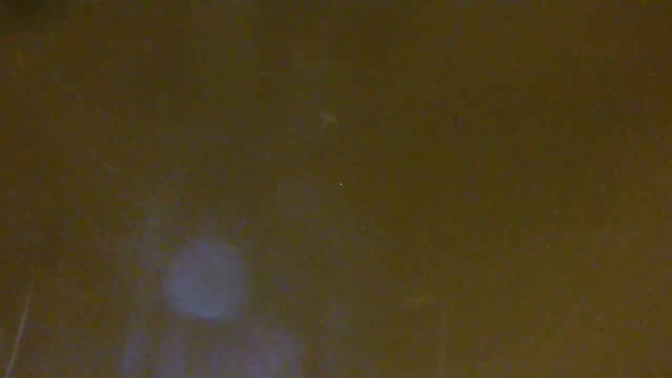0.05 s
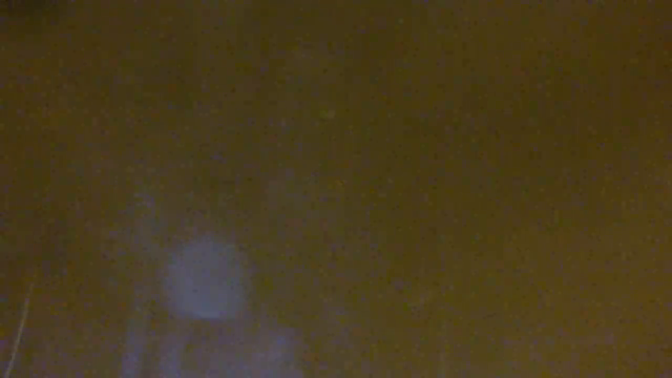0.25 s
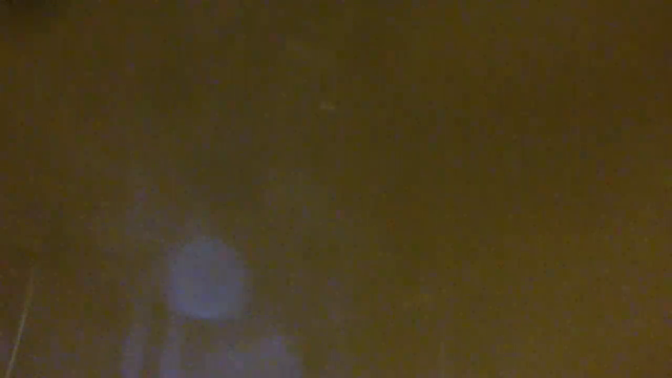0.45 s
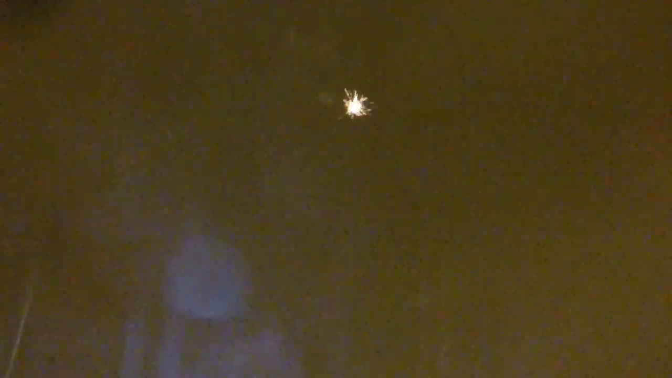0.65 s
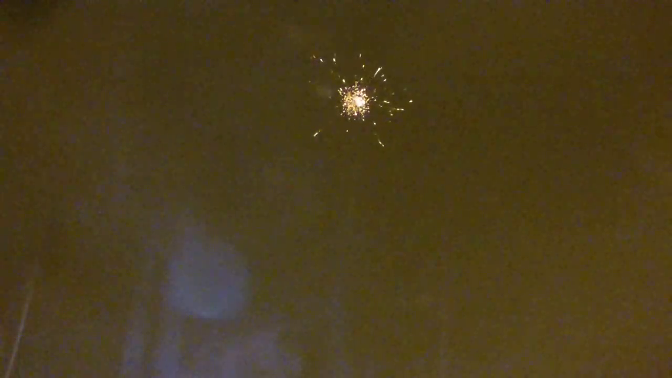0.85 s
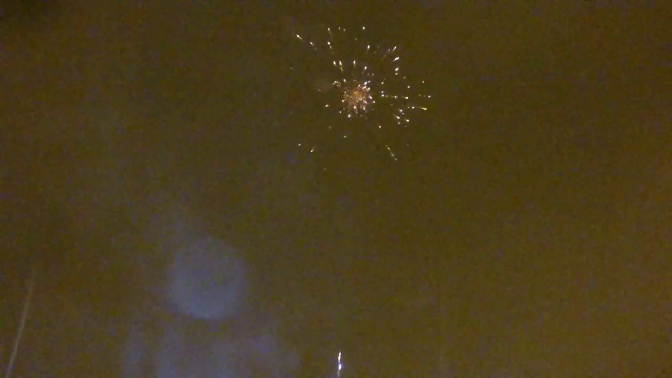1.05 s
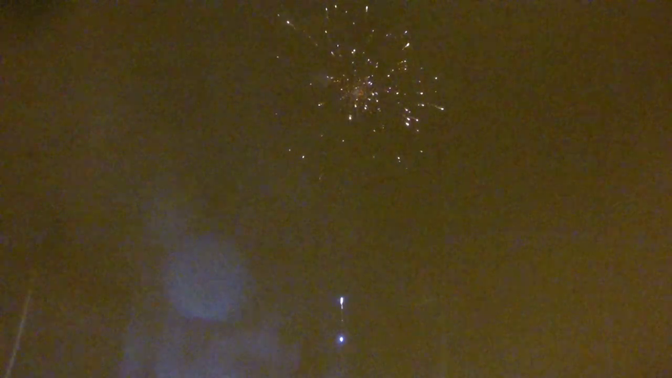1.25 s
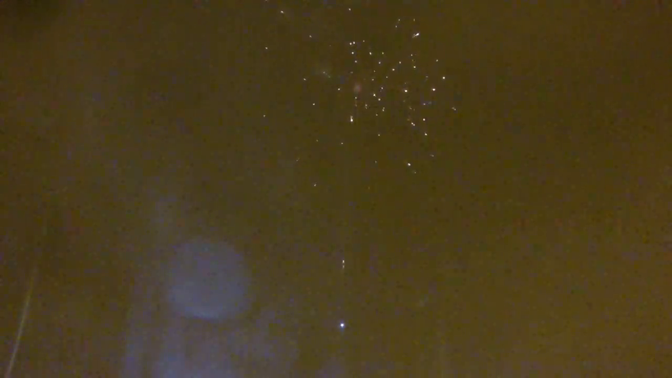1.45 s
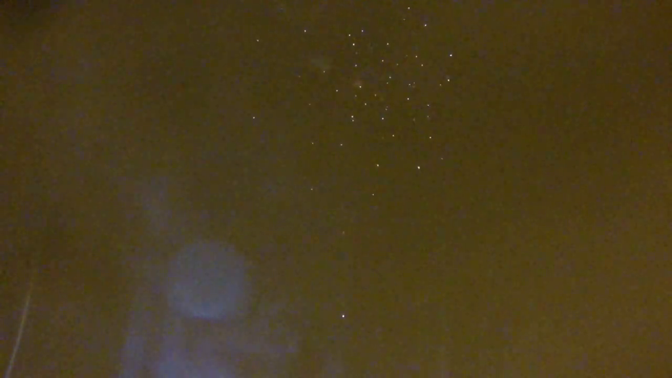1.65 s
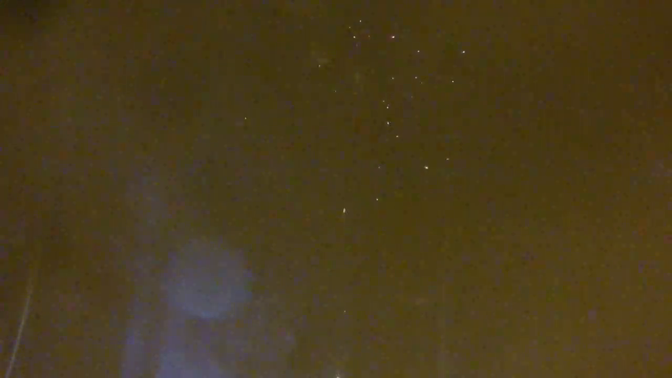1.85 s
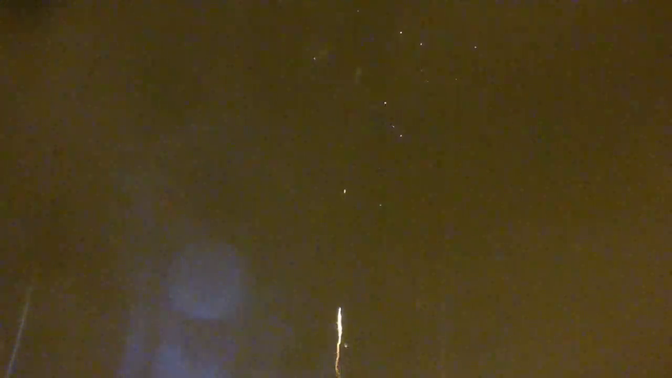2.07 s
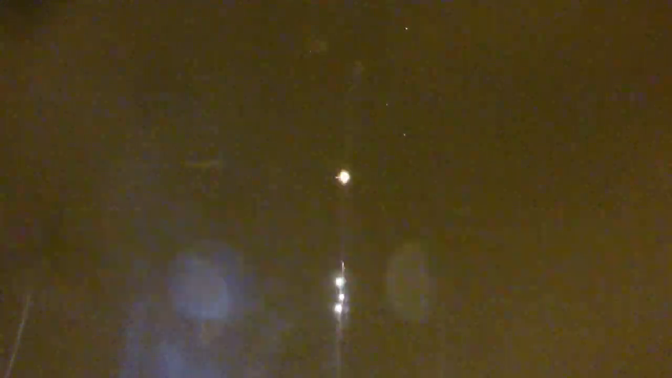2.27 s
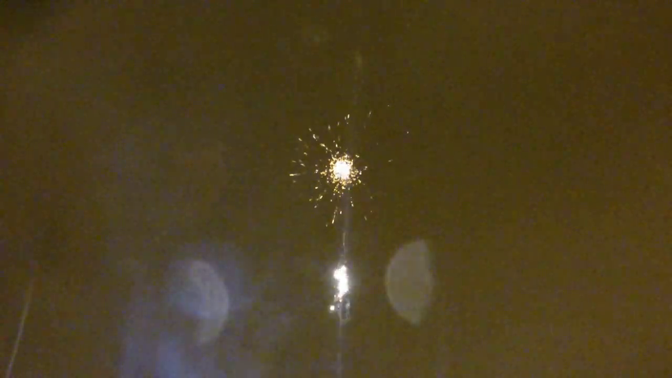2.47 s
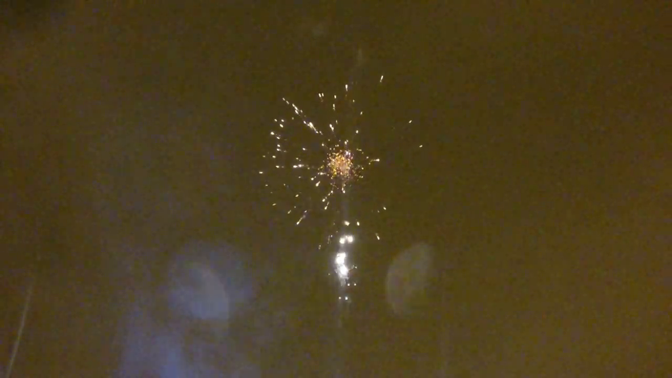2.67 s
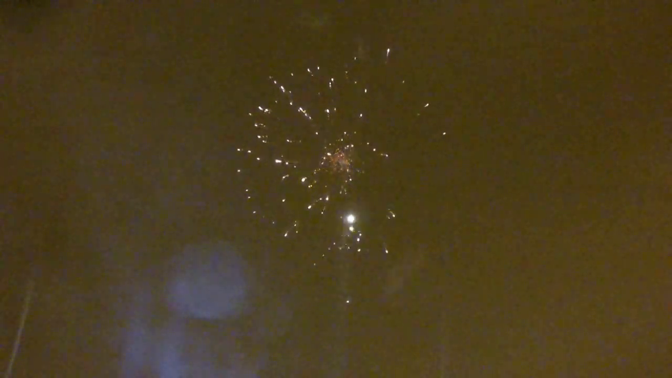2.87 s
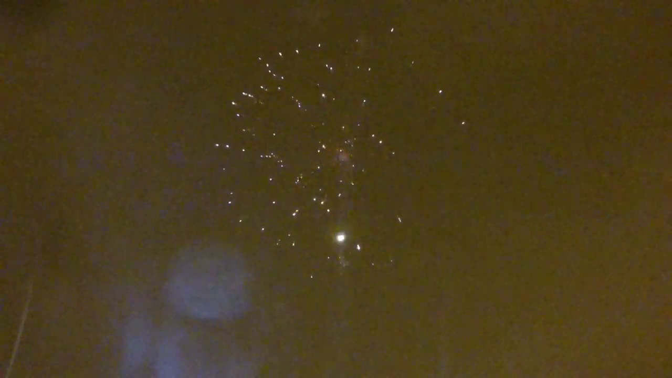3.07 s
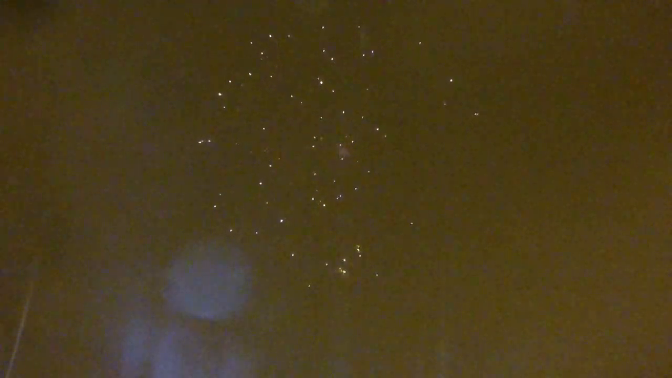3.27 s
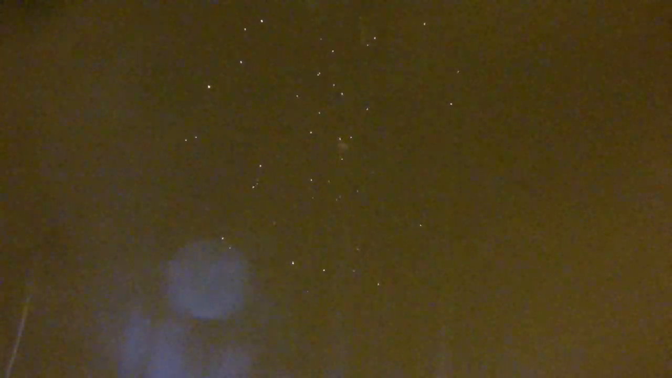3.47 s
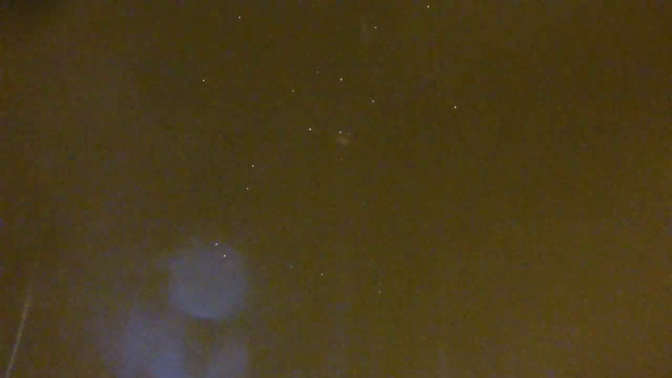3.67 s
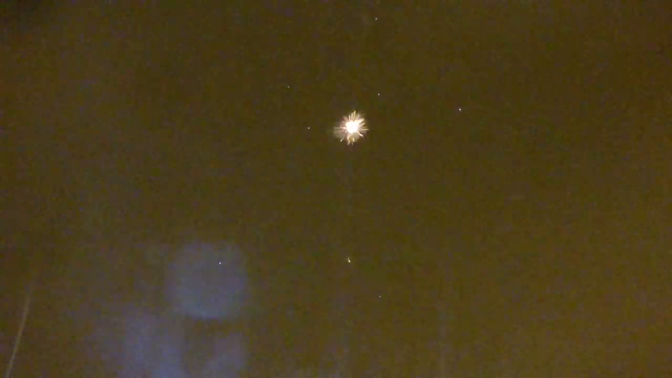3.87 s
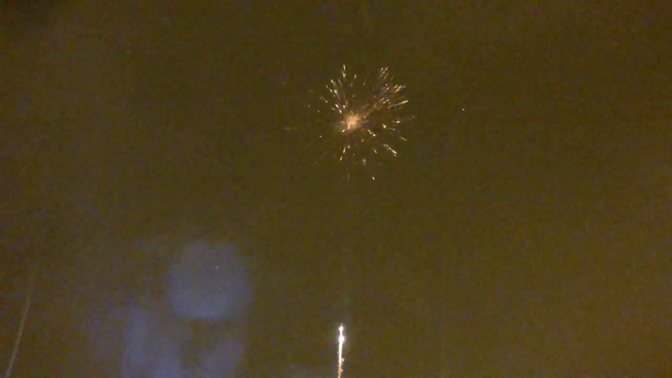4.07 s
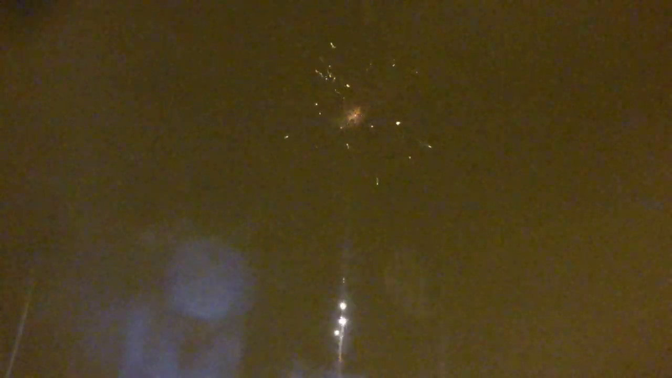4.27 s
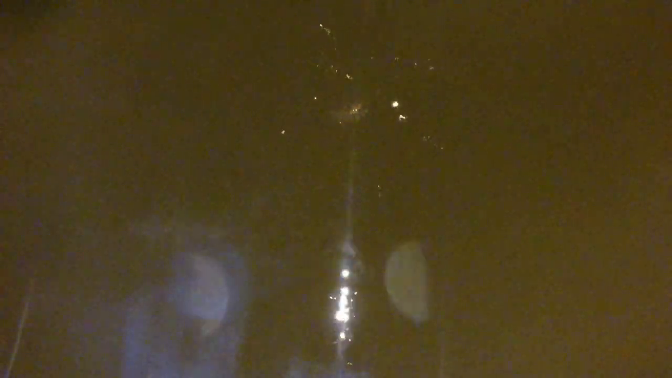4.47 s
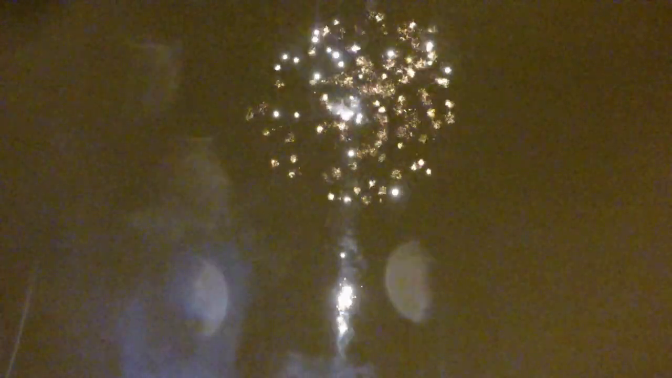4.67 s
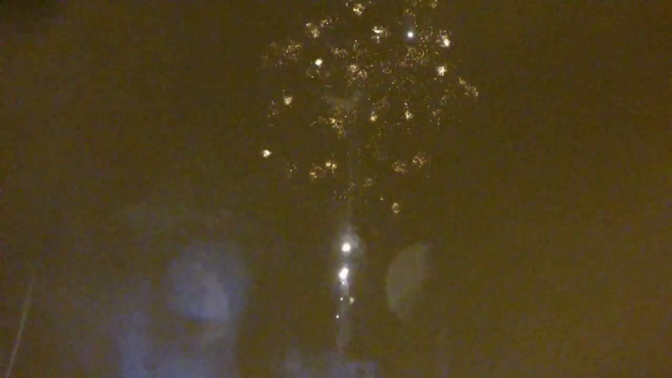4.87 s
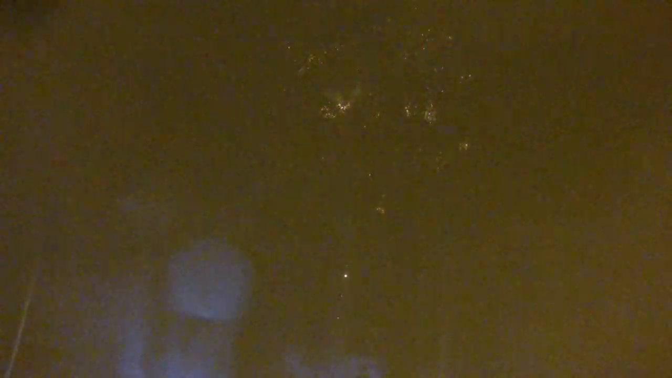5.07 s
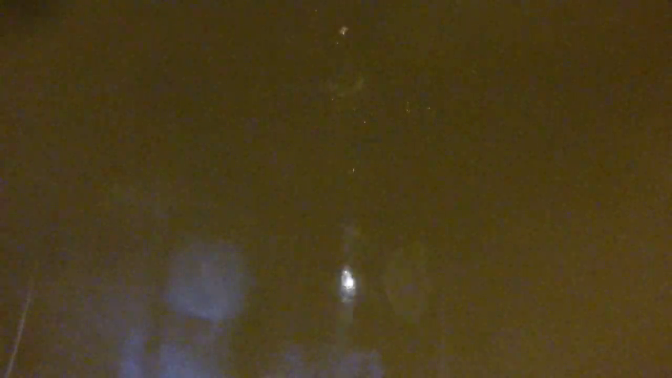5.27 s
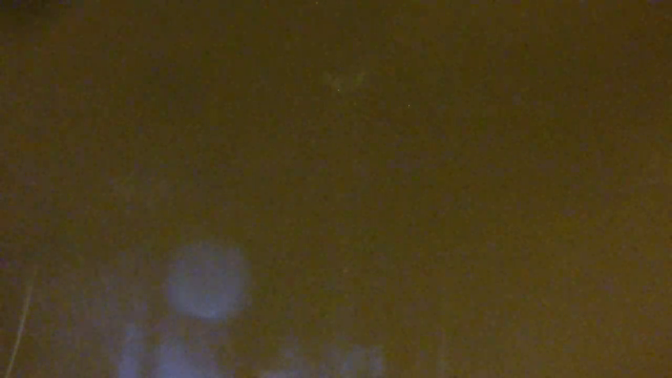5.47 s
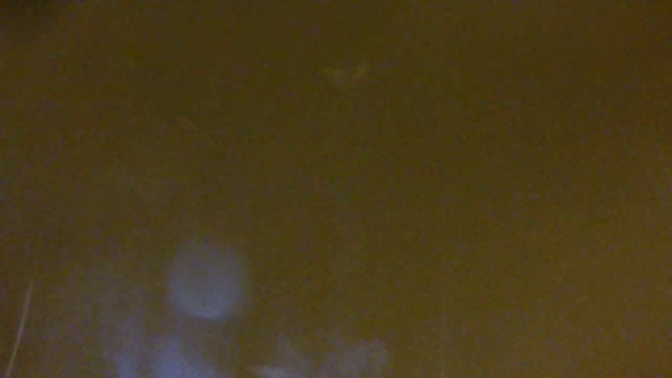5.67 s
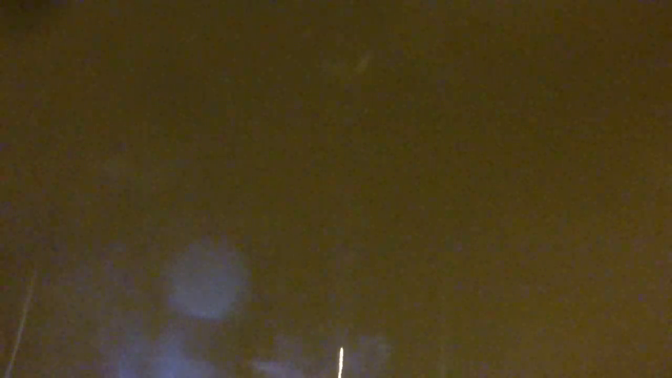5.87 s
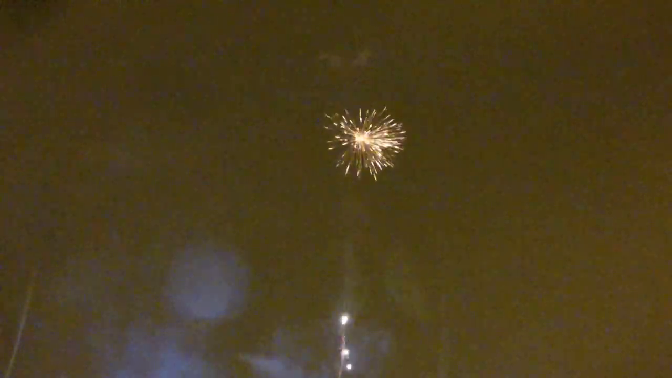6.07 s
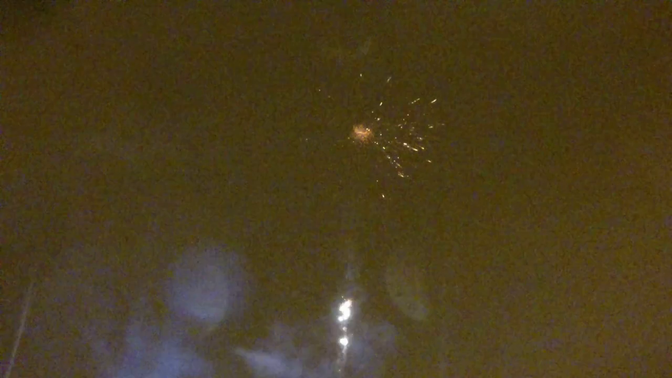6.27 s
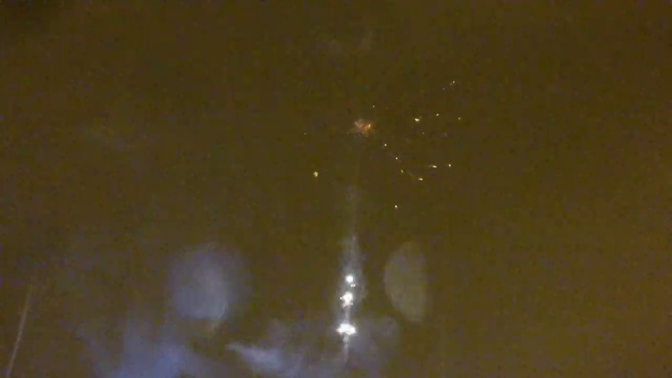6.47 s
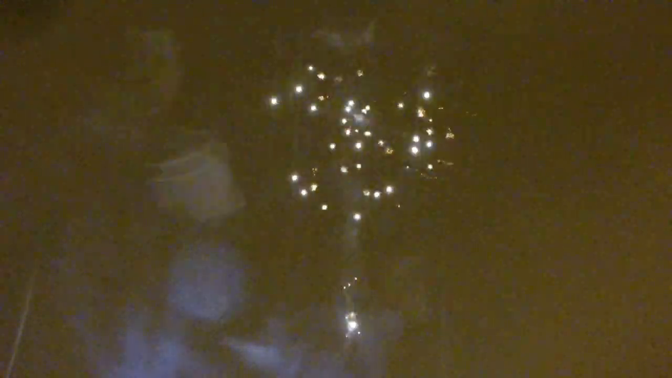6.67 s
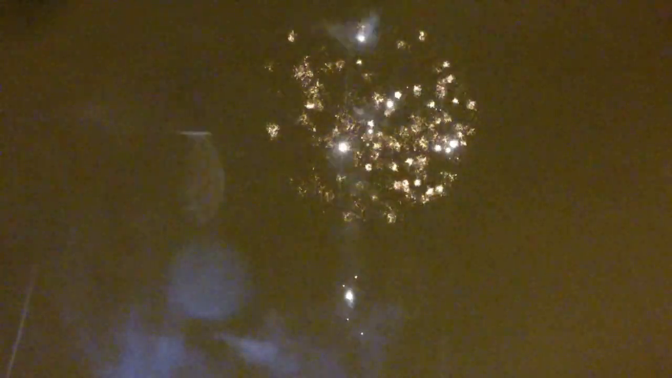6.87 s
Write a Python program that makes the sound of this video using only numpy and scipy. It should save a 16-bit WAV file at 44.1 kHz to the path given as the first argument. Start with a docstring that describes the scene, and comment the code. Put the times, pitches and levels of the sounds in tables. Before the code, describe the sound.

Four sharp firework bangs, the last three followed by swelling crackle, heard from inside an idling car with low wind rumble.

```python
"""A firework cake at night, heard on a camera microphone inside a parked car.
From the start the engine idles and wind makes the cabin boom; a bit of plastic ticks close by.
Outside, a first shell bursts with one sharp bang, echoes off the houses and fizzles out. Three more
each leave the tube with a soft thud, burst and scatter stars that crackle in a swelling cloud; the
last thud booms in the cabin too. The camera's gain control ducks after every bang and creeps back."""
import sys
import numpy as np
from scipy import signal
from scipy.fft import rfft, irfft, next_fast_len
from scipy.io import wavfile
from scipy.ndimage import map_coordinates

SR = 44100
rng = np.random.default_rng(int(sys.argv[2]) if len(sys.argv) > 2 else 0)


def transcribe(u):
    """Save the signal u as a 16-bit wav file named by the first command-line argument.

    u: samples, shape (n,) or (channels, n), limited to [-1, 1]; the rate is SR.
    q: integer samples, one column per channel.
    """
    v = np.clip(np.atleast_2d(u).T, -1, 1)
    q = np.round(v * 32767).astype(np.int16)
    wavfile.write(sys.argv[1], SR, q)


N = 305613

# Levels are relative within each table.
# the idling engine, from inside the car: multiple of the crank speed, level/dB
ENGINE_ORDERS = [(2, -64), (3, -56), (4, -46.5), (6, -41.5), (8, -64.5), (10, -64), (14, -67), (17, -73)]
# swells of low cabin boom, from wind gusts and (last row) the last launch's thud:
# strongest t/s, half length/s, level/dB
BOOM_SWELLS = [(0.124, 0.039, -28), (1.542, 0.034, -29.5), (2.188, 0.11, -36.5), (2.827, 0.053, -29.5),
               (2.941, .06, -27.5), (3.158, 0.072, -29.5), (3.405, 0.09, -26), (3.595, .06, -29),
               (3.772, 0.17, -38), (4.89, 0.037, -31.5), (5.811, 0.029, -31.5)]
# spectrum of the steady rush of air and engine: f/Hz, level/dB
RUSH_SPECTRUM = [(20, 4.5), (130, 2), (200, -1.5), (400, -7), (800, -12), (1300, -14), (2100, -11.5),
                 (3300, -15.5), (5000, -22), (5700, -21), (7000, -28), (12000, -33), (16000, -62)]
# a small tick close to the microphone: t/s, level/dB
TICKS = [(0.3217, -29)]
# modes of the ticking plastic: f/Hz, level/dB, t60/s
PLASTIC_MODES = [(2460, -3.5, 0.012), (2820, -10, 0.007), (5800, -14, 0.0068), (8500, -15, 0.005)]
# shells bursting outside: t/s, level/dB
BURSTS = [(0.8807, 5), (2.5133, 6), (4.116, 8), (6.237, 7)]
# colour of a burst: f/Hz, level/dB
BURST_COLOUR = [(100, -4), (250, 7), (450, 7), (800, -3.5), (2000, 2.5), (3000, -2), (6000, -2.5),
                (10000, -1), (15000, -16.5)]
# air modes of the cabin around the microphone: f/Hz, level/dB, t60/s
CABIN_MODES = [(74, -24, 0.22), (81.8, -21, 0.41), (102.7, -25.5, 0.36), (260, -20, 0.097),
               (318, -20, 0.063), (397, -21, 0.032), (527, -17.5, 0.05)]
# how a sharp pressure step reaches the microphone in its housing: f/Hz, level/dB
HOUSING_RESPONSE = [(40, -18.5), (130, 1.5), (280, -3.5), (550, -4.5), (750, -10), (1300, -7.5),
                    (1700, -1.5), (2200, 6.5), (3300, 2.5), (3900, -5), (6000, -8), (8000, -22.5),
                    (10000, -23.5), (15000, -30)]
# cancellations in the housing: f/Hz, half width/Hz, depth/dB
HOUSING_NOTCHES = [(2517, 267, -16.5), (3923, 71, -11), (4558, 12.4, -28), (5290, 50, -20), (7860, 45, -26)]
# reverberation inside the car: f/Hz, t60/s
CABIN_DECAY = [(200, 0.12), (600, .1), (2000, 0.099), (6000, 0.078), (14000, 0.009)]
# echoes from house fronts, nearest first: delay/s, level/dB
HOUSE_ECHOES = [(.029, -27.5), (.085, -32), (.163, -31.5)]
# reverberation out in the street: f/Hz, t60/s
STREET_DECAY = [(200, 0.83), (1000, 1.1), (3500, 1.5), (6000, 0.6), (12000, 0.6)]
# the first shell's sparks, a quick flare and a slow afterglow: level/dB, t60/s
FIZZLE_STAGES = [(-39, 0.24), (-57, 2.4)]
# single stars that pop clear of the crackle: t/s, level/dB
SINGLE_STARS = [(1.4281, -38.5), (2.2465, -32), (2.3348, -33.5), (2.384, -28), (2.419, -21.5),
                (2.4624, -17.5), (2.497, -22), (2.507, -21), (3.039, -23.5), (3.061, -18.5), (3.087, -17.5),
                (3.1077, -20.5), (3.1186, -18.5), (3.154, -20), (3.1586, -18.5), (3.17, -19), (3.1909, -19),
                (3.2149, -19), (3.263, -16), (3.266, -19), (3.3019, -20.5), (3.346, -22), (3.3667, -18),
                (3.4377, -18.5), (3.6568, -18.5), (4.0366, -15.5), (4.3381, -28.5), (4.364, -29),
                (4.394, -28), (4.4231, -25.5), (5.107, -11.5), (5.1159, -19), (5.1383, -13), (5.1925, -21),
                (5.225, -18), (5.2342, -18.5), (5.3423, -14), (5.411, -18.5), (5.452, -28), (5.4967, -18),
                (5.5061, -17.5), (6.15, -28), (6.1624, -27.5), (6.5264, -18), (6.724, -15.5),
                (6.9132, -17.5)]
# clouds of crackle: start t/s, thickest t/s, end t/s, pops a second at the thickest,
# pop level there/dB, opening rate as a share of the thickest
CRACKLE_CLOUDS = [(2.52, 2.88, 3.1, 253, -12.5, .45), (4.445, 4.885, 5.17, 612, -8.5, .22),
                  (6.249, 6.71, 7.3, 200, -12, .5)]
# colour of a star's pop: f/Hz, level/dB
STAR_COLOUR = [(200, 3.5), (1000, 1.5), (2000, 2.5), (3000, -1), (6000, 1.5), (8500, 4), (10500, -2),
               (13000, 13)]
# shells leaving their tubes: t/s, level/dB
LAUNCHES = [(1.842, -30.5), (3.877, -32), (5.766, -27.5)]
# colour of a launch thud: f/Hz, level/dB
LAUNCH_COLOUR = [(100, 4.5), (300, 7.5), (700, -3.5), (2000, -4.5), (6000, -4.5), (12000, -12)]


def amp(db):
    """Decibels to gain."""
    return 10 ** (np.asarray(db) / 20)


def unit(x):
    """Scale to rms 1."""
    return x / np.sqrt(np.mean(x ** 2) + 1e-20)


def along(points, hz):
    """Read (f/Hz, value) points on a log frequency axis."""
    f, value = np.transpose(points)
    return np.interp(np.log(hz + 1), np.log(f + 1), value)


def wobble(rate):
    """A smooth random curve, rate knots a second."""
    knots = rng.standard_normal(int(N * rate / SR) + 4)
    return map_coordinates(knots, [np.arange(N) * rate / SR])


def filtered(x, response):
    """x through a frequency response."""
    size = next_fast_len(N + SR // 2)
    return irfft(rfft(x, size) * response(np.fft.rfftfreq(size, 1 / SR)), size)[:N]


def noise(shape_db):
    """Noise of rms 1 whose spectrum is a function of frequency."""
    return unit(filtered(rng.standard_normal(N), lambda hz: amp(shape_db(hz))))


def convolve(x, response):
    """x through an impulse response."""
    return signal.fftconvolve(x, response)[:N]


def impulses(rows):
    """One spike for each (t/s, level/dB) row."""
    times, db = np.transpose(rows)
    return np.bincount(np.round(times * SR).astype(int), amp(db), N)[:N]


def ringing(modes):
    """Impulse response of (f/Hz, level/dB, t60/s) modes."""
    t = np.arange(SR // 2) / SR
    return sum(amp(db - 60 * t / t60) * np.sin(2 * np.pi * hz * t) for hz, db, t60 in modes)


def engine(crank_hz=13.0, drift=0.0046, unsteady_db=1.9):
    """A slow idle heard from inside the car: each order of the crank wavers a little."""
    turns = np.cumsum(crank_hz * (1 + drift * wobble(3.14))) / SR
    hum = np.zeros(N)
    for order, db in ENGINE_ORDERS:
        level = amp(db + unsteady_db * wobble(5.28))
        hum += level * unit(np.sin(2 * np.pi * (order * turns + rng.random())))
    return hum


def cabin_air(boom_hz=71.1, wander_hz=1.34, breeze_db=-45, rumble_db=-47, rumble_hz=80, rush_db=-55):
    """Breeze, gusts and the last launch sound the cabin's lowest mode, over rumble and a faint rush."""
    t = np.arange(N) / SR
    breeze = amp(breeze_db + wobble(8))
    swells = sum(amp(db) * np.exp(-((t - peak) / half) ** 2) for peak, half, db in BOOM_SWELLS)
    phase = 2 * np.pi * np.cumsum(boom_hz + wander_hz * wobble(6.2)) / SR
    boom = np.hypot(breeze, swells) * unit(np.sin(phase))
    rumble = noise(lambda hz: -24 * np.abs(np.log2((hz + 1) / rumble_hz)))
    rush = noise(lambda hz: along(RUSH_SPECTRUM, hz))
    return boom + amp(rumble_db) * rumble + amp(rush_db + 0.56 * wobble(1.55)) * rush


def camera_whine(centre_hz=14180, width_hz=70, level_db=-80):
    """A thin whistle from the electronics behind the microphone."""
    return amp(level_db) * noise(lambda hz: -20 * np.log10(1 + ((hz - centre_hz) / width_hz) ** 2))


def plastic_tick():
    """A bit of plastic clicks and rings briefly, close to the microphone."""
    return convolve(impulses(TICKS), ringing(PLASTIC_MODES))


def bursts(shock_db=7.5, boom_db=-7.0, build_s=0.0087, roll_db=-11, roll_hz=170, roll_t60=0.46):
    """One shock per shell reaches the car; the cabin air swings against it and a low roll follows."""
    shocks = impulses(BURSTS)
    t = np.arange(SR // 2) / SR
    swell = 1 - np.exp(-(t / build_s) ** 2)
    boom = convolve(shocks, swell * ringing(CABIN_MODES))
    fade = swell * amp(-60 * t / roll_t60)
    low_noise = noise(lambda hz: -14 * np.abs(np.log2((hz + 1) / roll_hz)))
    roll = convolve(shocks, fade / np.linalg.norm(fade)) * low_noise
    bang = convolve(shocks, housing_pulse(BURST_COLOUR))
    return amp(boom_db) * boom + amp(roll_db) * roll - amp(shock_db) * bang


def housing_pulse(colour, smear_s=0.00064, lag_s=0.00052, bounce_s=0.000438, reflect=0.373, size=4096):
    """A pulse of this colour as it reaches the microphone through its housing, energy 1."""
    hz = np.fft.rfftfreq(size, 1 / SR)
    notches_db = sum(depth / (1 + ((hz - f) / width) ** 2) for f, width, depth in HOUSING_NOTCHES)
    db = along(HOUSING_RESPONSE, hz) + along(colour, hz) + notches_db
    cepstrum = irfft(np.log(amp(db)))
    cepstrum[1:size // 2] *= 2  # fold to minimum phase: nothing rings ahead of the pulse
    cepstrum[size // 2:] = 0
    delay = lag_s + smear_s / (1 + (hz / 4000) ** 2)  # the treble comes through first
    phase_lag = 2 * np.pi * np.cumsum(delay) * hz[1]
    round_trip = np.exp(-2j * np.pi * hz * bounce_s)
    flutter = (round_trip - reflect) / (1 - reflect * round_trip)  # bouncing to and fro inside
    pulse = irfft(flutter * np.exp(rfft(cepstrum) - 1j * phase_lag))
    return pulse / np.linalg.norm(pulse)


def reverb_tail(decay, size):
    """Reverberation of energy 1; each frequency dies at its own speed."""
    hz, t, spectra = signal.stft(rng.standard_normal(size), SR, nperseg=256)
    fade = amp(-60 * t / along(decay, hz)[:, None])
    tail = signal.istft(spectra * fade, SR, nperseg=256)[1]
    return tail / np.linalg.norm(tail)


def surroundings(direct, cabin_db=-13, echo_db=1, street_db=-26, bass_cut_hz=700):
    """Close by, the cabin rings; farther off, house fronts answer with little bass, then the street."""
    cabin = convolve(direct, reverb_tail(CABIN_DECAY, size=SR // 2))
    echoes = convolve(cabin, impulses(HOUSE_ECHOES)[:SR])
    echoes = filtered(echoes, lambda hz: 1j * hz / (bass_cut_hz + 1j * hz))
    street = convolve(direct, reverb_tail(STREET_DECAY, size=2 * SR))
    return direct + amp(cabin_db) * cabin + amp(echo_db) * echoes + amp(street_db) * street


def sparks(centre_hz=3300, flicker_db=3):
    """Burning sparks give a soft, flickering hiss that dies away after the first burst."""
    age = np.arange(N) / SR - BURSTS[0][0]
    glow = (age > 0) * sum(amp(db - 60 * np.abs(age) / t60) for db, t60 in FIZZLE_STAGES)
    hiss = noise(lambda hz: -12 * np.log2((hz + 1) / centre_hz) ** 2)
    return glow * amp(flicker_db * wobble(28.8)) * hiss


def star_pops(times, sizes, centre_hz=4700, spread=0.12, growth=0.055, usual_db=-12, window=48):
    """Tiny explosions: a push and a pull; bigger ones last longer and sound duller."""
    stretch = np.exp(spread * rng.standard_normal(len(times))) * (sizes / amp(usual_db)) ** growth
    width_s = stretch / (2 * np.pi * centre_hz)
    index = np.round(times * SR).astype(int)[:, None] + np.arange(window) - window // 2
    offset = (index / SR - times[:, None]) / width_s[:, None]
    waves = offset * np.exp(-offset ** 2 / 2)
    waves *= sizes[:, None] / np.linalg.norm(waves, axis=1, keepdims=True)
    return np.bincount(np.clip(index, 0, N).ravel(), waves.ravel(), N + 1)[:N]


def crackle(star_db=9.0, scatter_db=3.0, jitter=.7, clump_db=2.14, grow_db_per_s=14.5, closing=.07):
    """Stars burn for nearly the same time, so their pops thicken and thin out, in random clumps."""
    star_times, db = np.transpose(SINGLE_STARS)
    air = star_pops(star_times, amp(db + star_db))
    t = np.arange(N) / SR
    clumps = amp(clump_db * wobble(70))
    clumps /= clumps.mean()
    for start, thickest, end, rate, pop_db, opening in CRACKLE_CLOUDS:
        position = np.interp(t, [start, thickest, end], [-1, 0, 1])
        edge_share = np.where(position < 0, opening, closing)
        density = rate * edge_share ** (position ** 2) * (np.abs(position) < 1)
        due = np.cumsum(density * clumps) / SR  # pops expected so far
        time_luck, size_luck = rng.standard_normal((1000, 2))[:int(due[-1])].T
        turn = np.arange(len(time_luck)) + .5 + jitter * time_luck
        times = np.searchsorted(due, np.clip(turn, .1, due[-1] - .1)) / SR
        swell_db = grow_db_per_s * np.minimum(times - thickest, 0)  # louder up to the thickest point
        sizes = unit(amp(scatter_db * size_luck)) * amp(pop_db + swell_db)
        air += star_pops(times, sizes)
    return convolve(air, housing_pulse(STAR_COLOUR))


def launches(gain_db=14, gas_t60=0.027):
    """Out at the cake, the lift charge thuds and a short puff of gas follows it from the tube."""
    t = np.arange(SR // 5) / SR
    puff = rng.standard_normal(len(t)) * amp(-60 * t / gas_t60)
    puff /= np.linalg.norm(puff)
    puff[0] += 1  # the charge itself, with as much energy as the gas
    thuds = convolve(impulses(LAUNCHES), puff)
    return amp(gain_db) * convolve(thuds, housing_pulse(LAUNCH_COLOUR))


def scene():
    """One microphone in the car: fireworks and echoes outside, engine and cabin boom all around."""
    fireworks = surroundings(launches() + bursts() + crackle())
    return (fireworks + sparks() + plastic_tick() + engine() + cabin_air() + camera_whine())[None]


def record(dry, threshold_db=-4, recovery_db_per_s=9, attack_s=0.0006, top_hz=15800):
    """The camera's gain control ducks at each overload and creeps back; peaks that outrun it clip."""
    mic = dry[0]
    over_db = np.maximum(20 * np.log10(np.abs(mic) + 1e-9) - threshold_db, 0)
    ramp_db = recovery_db_per_s * np.arange(N) / SR
    held_db = np.maximum.accumulate(over_db + ramp_db) - ramp_db
    pole = np.exp(-1 / (attack_s * SR))
    duck_db = signal.lfilter([1 - pole], [1, -pole], held_db)
    clipped = np.clip(mic * amp(-duck_db), -1, 1)
    return filtered(clipped, lambda hz: hz < top_hz)[None]


dry = scene()
out = record(dry)
transcribe(out)
```